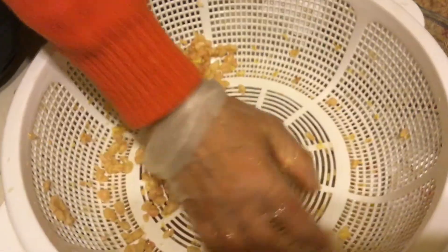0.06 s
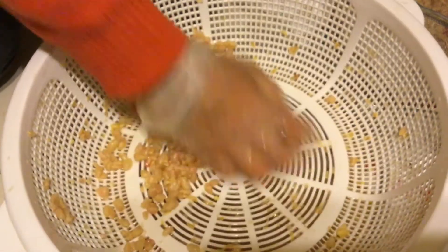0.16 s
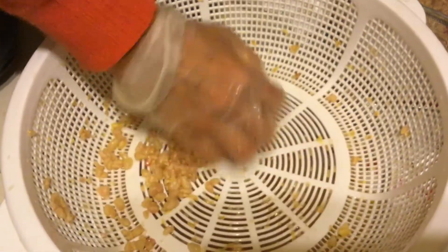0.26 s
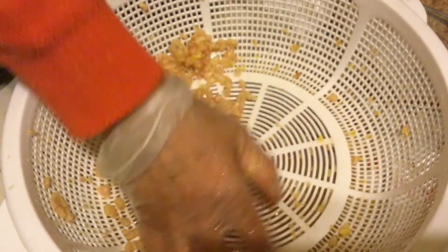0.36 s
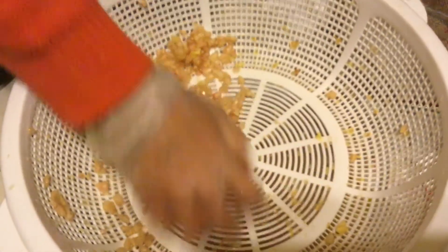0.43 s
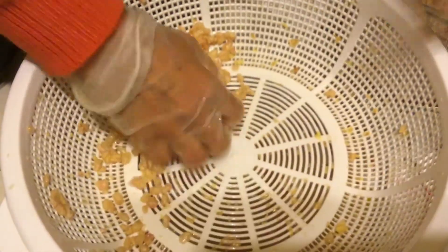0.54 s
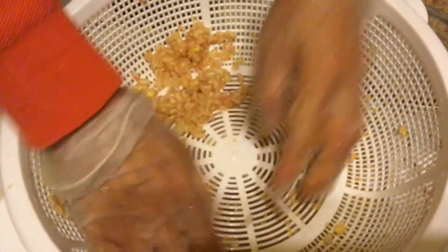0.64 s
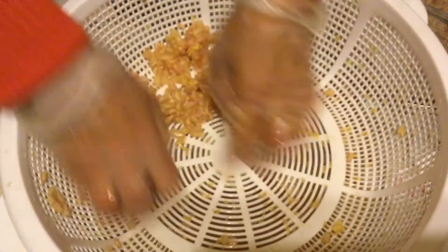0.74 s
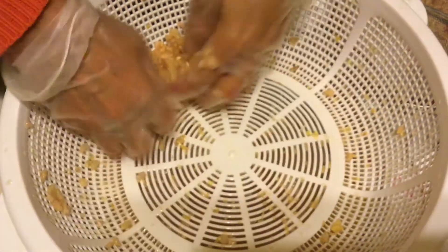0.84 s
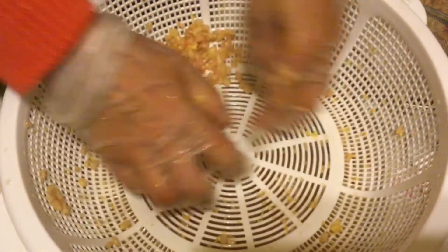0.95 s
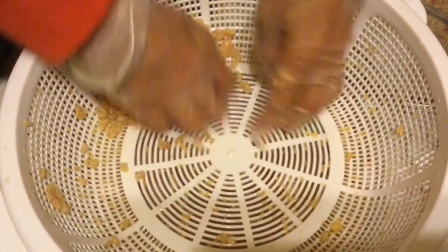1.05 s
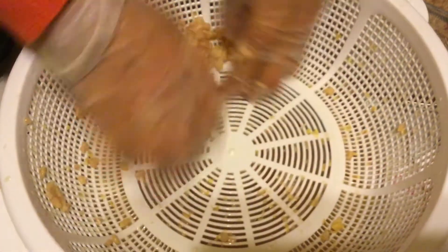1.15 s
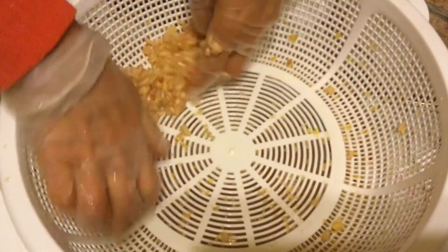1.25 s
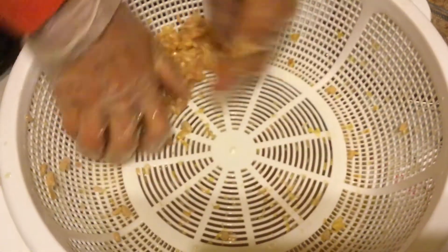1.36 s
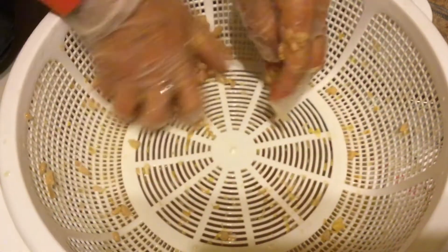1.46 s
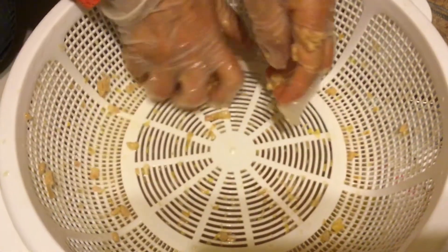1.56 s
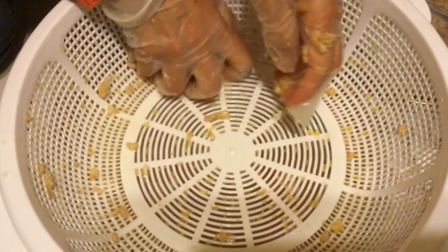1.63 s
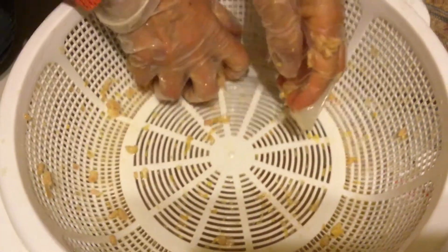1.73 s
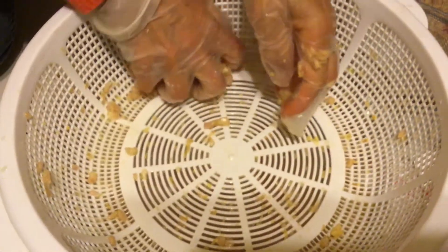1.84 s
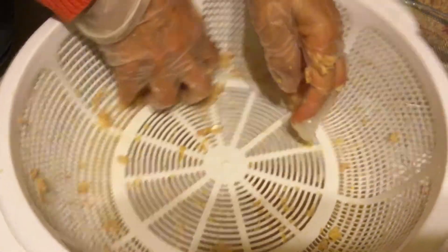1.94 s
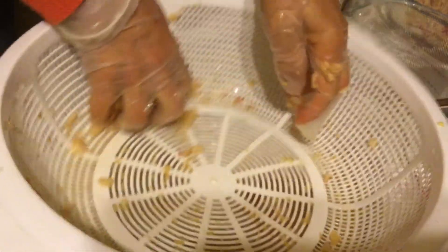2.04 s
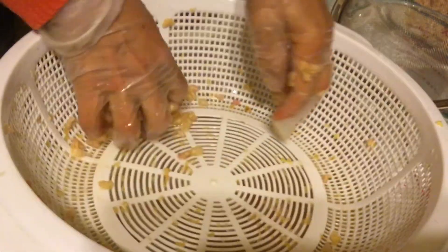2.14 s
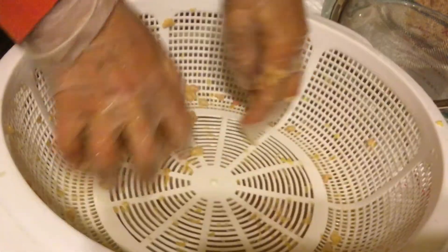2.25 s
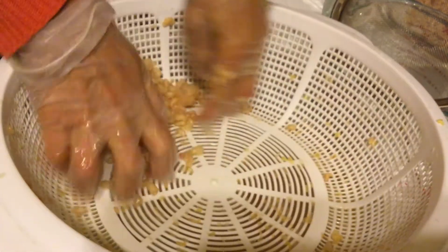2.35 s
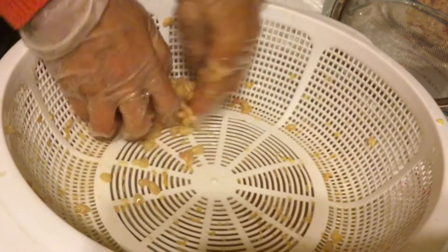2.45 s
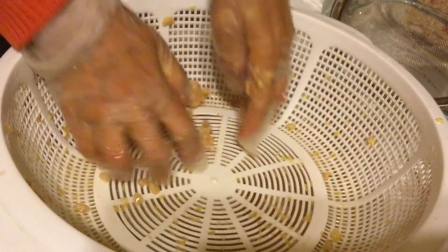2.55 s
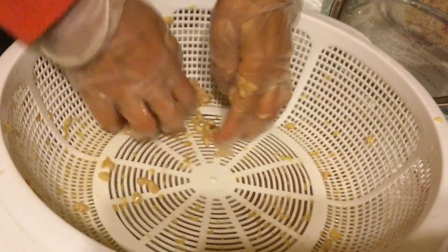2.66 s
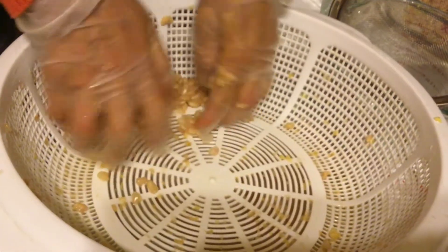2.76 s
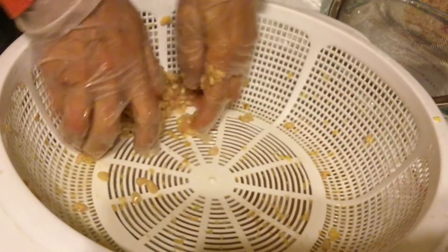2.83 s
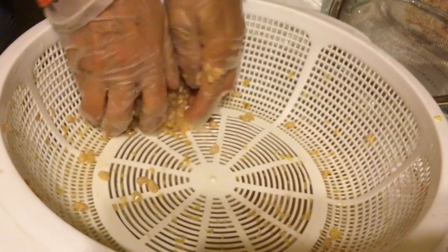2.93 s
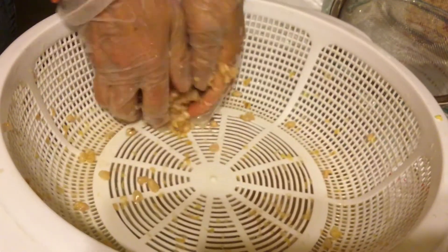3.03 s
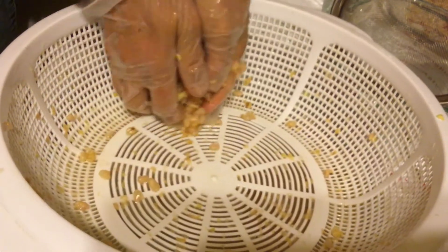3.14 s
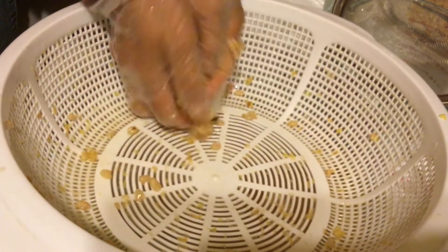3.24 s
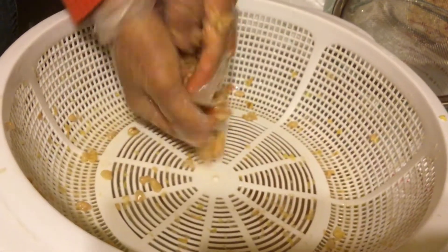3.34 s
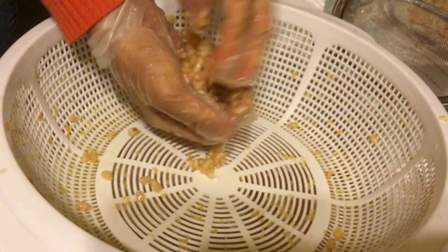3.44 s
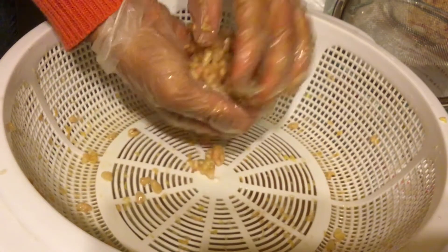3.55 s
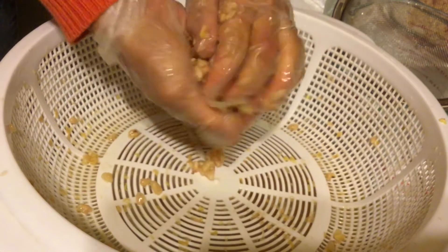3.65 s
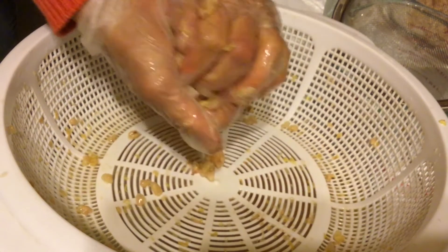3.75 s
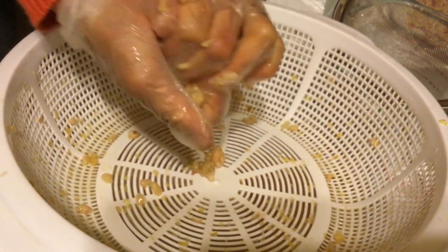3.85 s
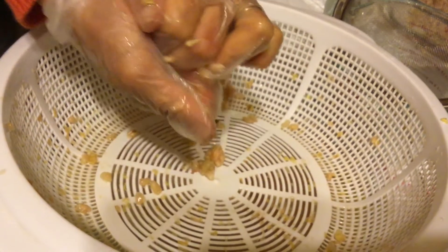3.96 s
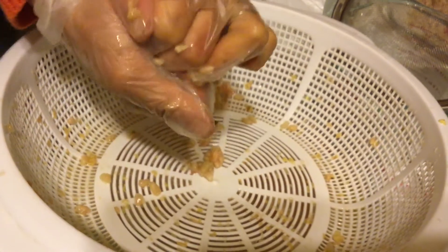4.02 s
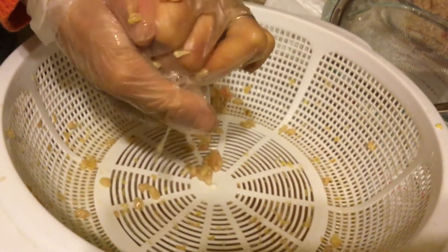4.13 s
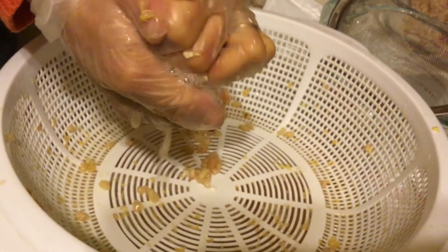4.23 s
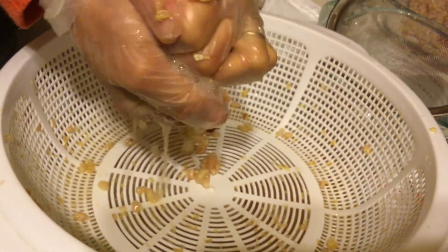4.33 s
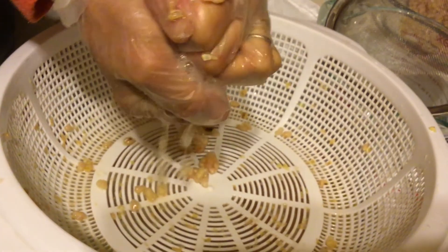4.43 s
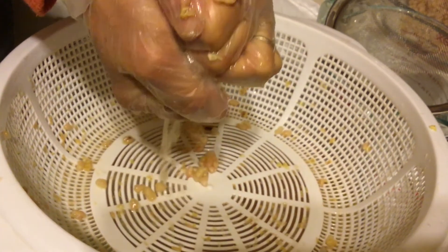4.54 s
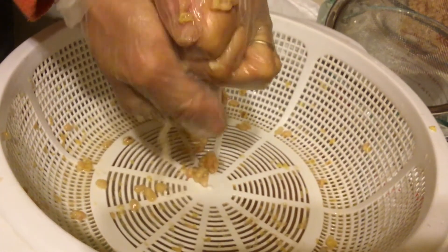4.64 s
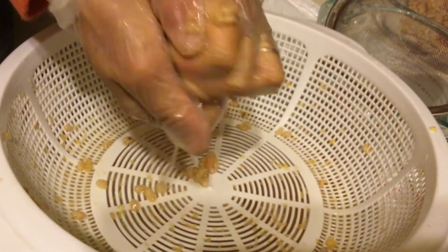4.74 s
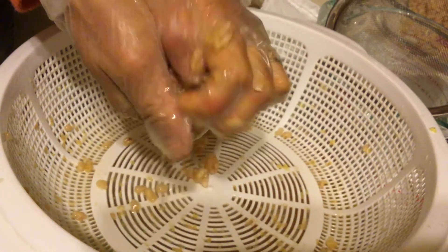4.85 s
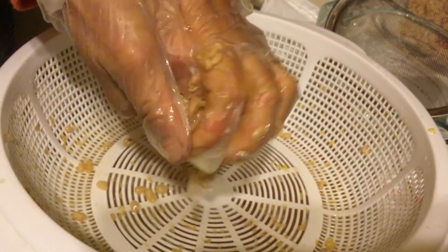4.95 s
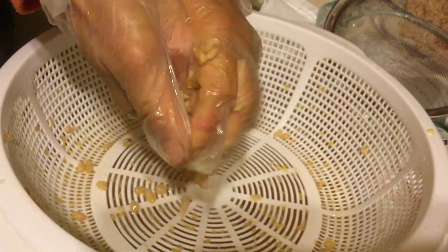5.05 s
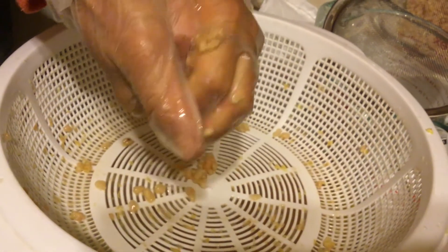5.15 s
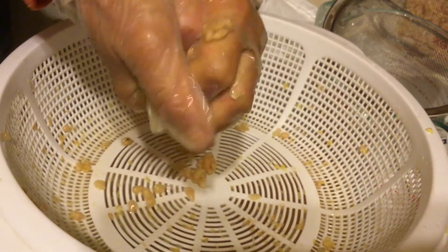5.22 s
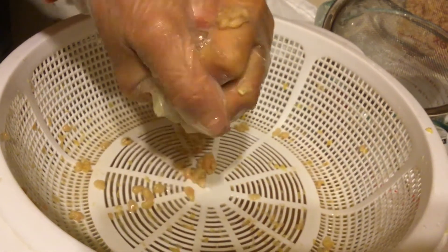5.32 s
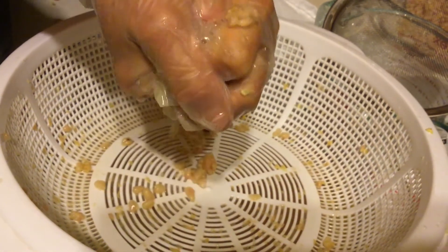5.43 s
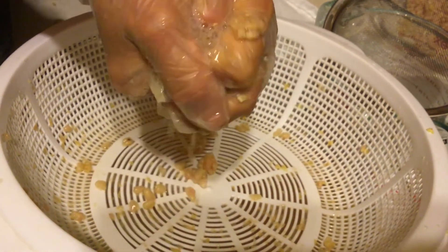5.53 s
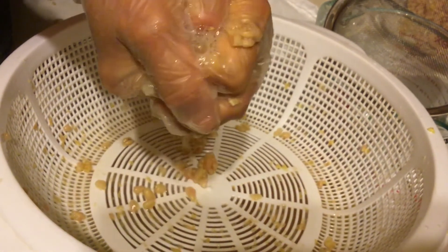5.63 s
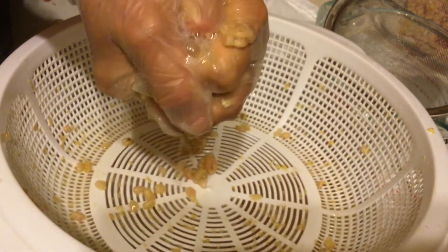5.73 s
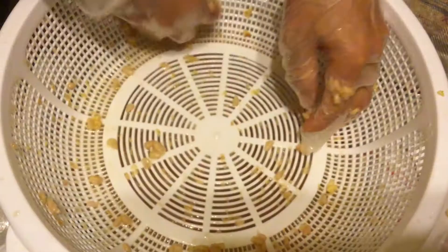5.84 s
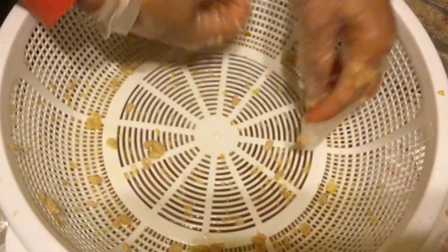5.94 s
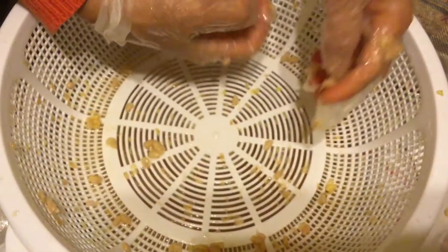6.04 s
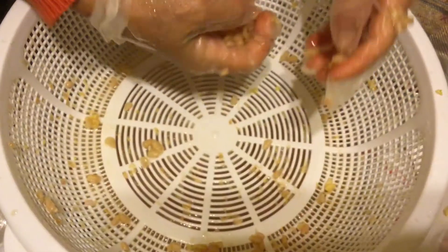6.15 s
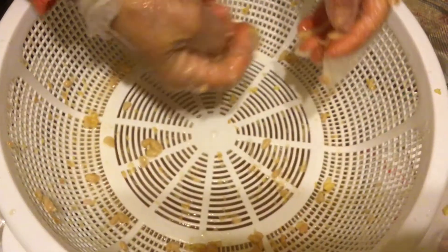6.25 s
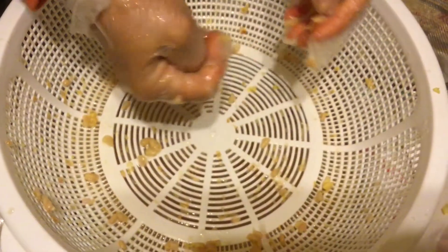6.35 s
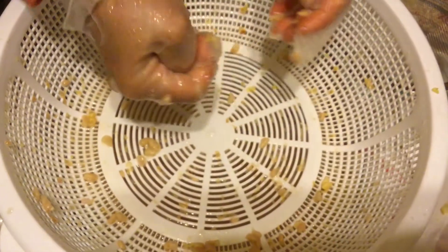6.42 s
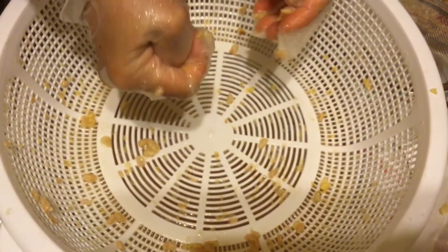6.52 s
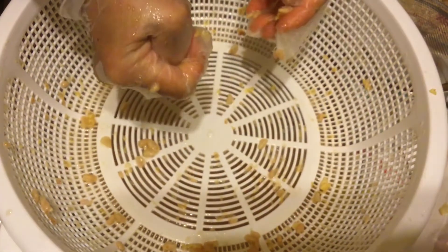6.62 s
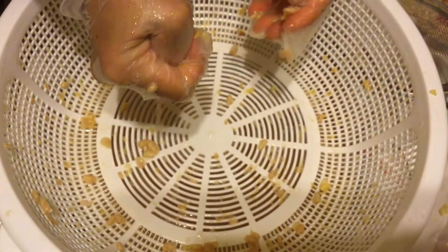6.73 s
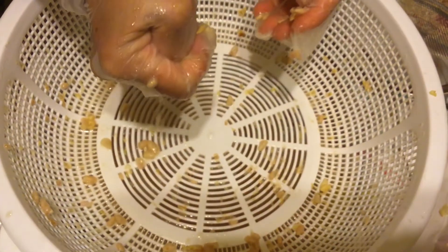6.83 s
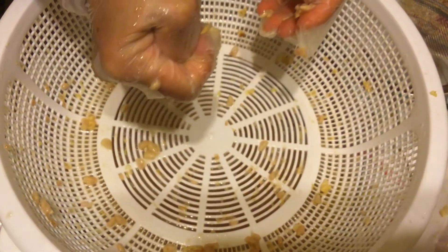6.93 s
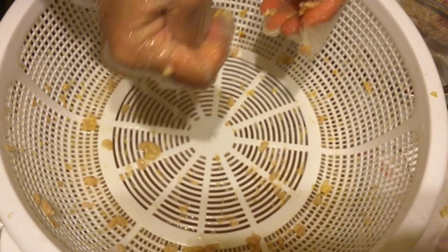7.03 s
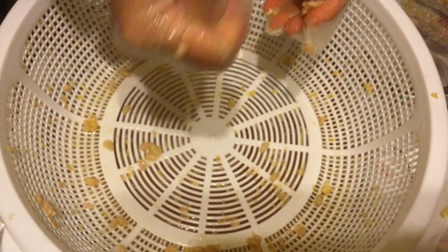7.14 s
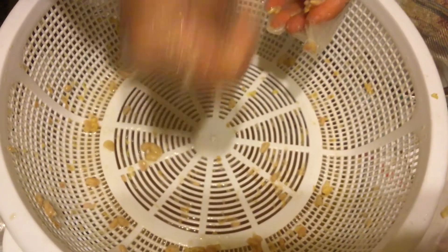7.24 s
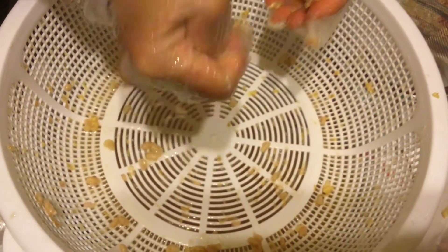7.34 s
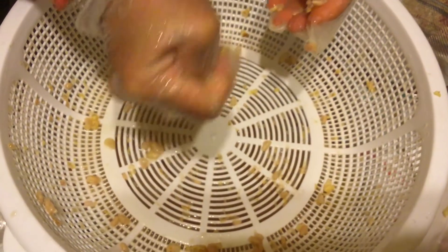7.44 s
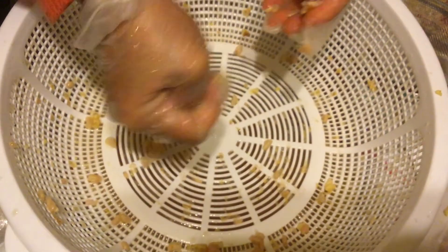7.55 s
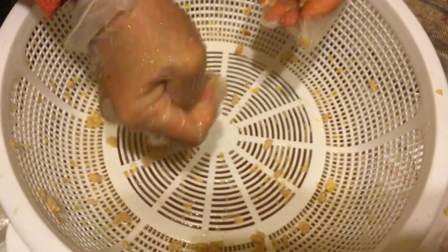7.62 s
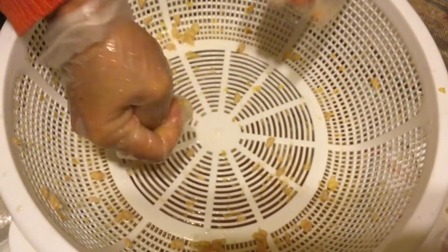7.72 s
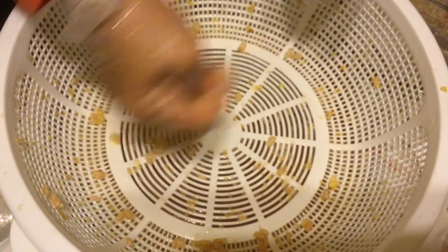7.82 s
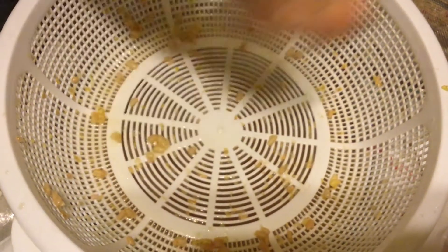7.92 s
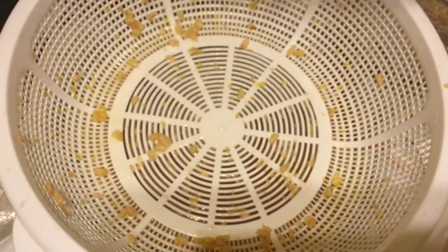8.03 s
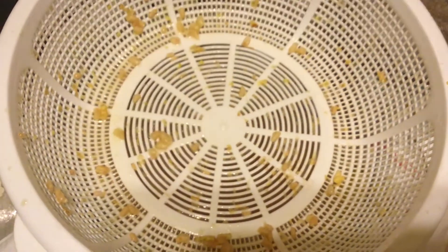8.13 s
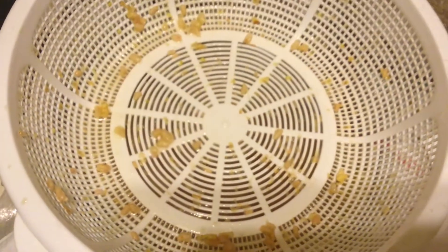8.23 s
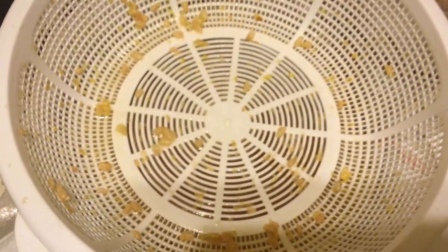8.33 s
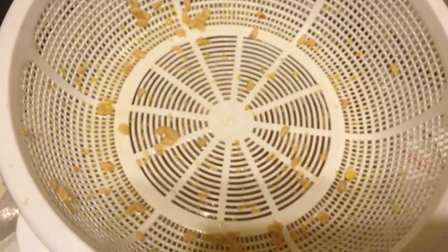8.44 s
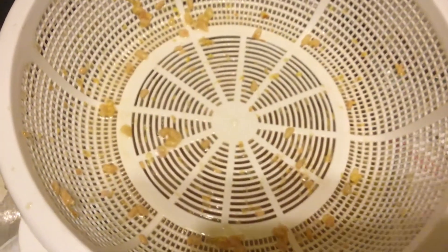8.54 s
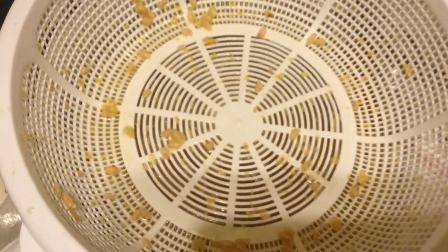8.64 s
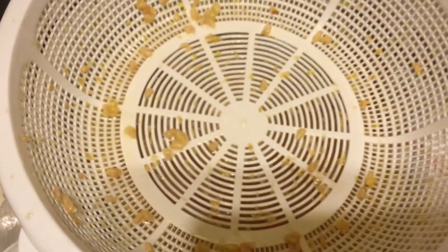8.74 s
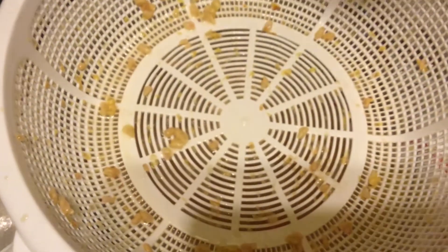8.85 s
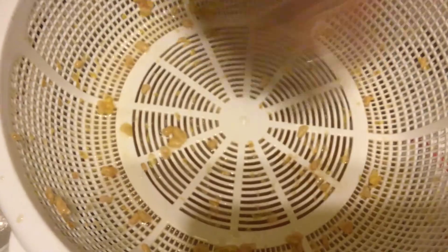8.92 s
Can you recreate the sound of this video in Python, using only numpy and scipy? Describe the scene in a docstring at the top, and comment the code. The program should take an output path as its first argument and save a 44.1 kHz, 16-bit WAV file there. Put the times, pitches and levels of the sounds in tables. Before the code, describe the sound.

Gloved hands scrape and knock wet seeds around a slotted plastic colander, then squeeze them with squishy crunches and crinkles over low rumble.

```python
"""Gloved hands sweep wet seeds across a slotted plastic colander, gather them and squeeze them out.
Knocks and scrapes ring the modes of its shell; wet seeds crunch as short rings and cracks over a rustle.
Gloves slide as fluttering hiss with ticks, creases snap, juice bubbles whistle and wet film squeaks.
A few dull thuds with falling pitch come through the counter; a low wavering noise rumbles in the kitchen."""
import sys
import numpy as np
from scipy import signal
from scipy.fft import rfft, irfft, next_fast_len
from scipy.io import wavfile

SR = 44100
rng = np.random.default_rng(int(sys.argv[2]) if len(sys.argv) > 2 else 0)


def generate_wav(signal):
    """Clip the signal to [-1, 1] and save it as 16-bit WAV at the path in sys.argv[1]."""
    frames = np.transpose(np.atleast_2d(signal))
    scaled = np.clip(frames, -1, 1) * 32767
    pcm = np.round(scaled).astype(np.int16)
    wavfile.write(sys.argv[1], SR, pcm)


N = 396018


def from_db(db):
    """Amplitude gain of a level in dB."""
    return 10 ** (np.asarray(db) / 20)


def rms_one(x):
    """Scale a signal to rms 1."""
    return x / np.sqrt(np.mean(x ** 2) + 1e-20)


def in_time(rows):
    """Turn a table of curve points into its columns, one value a sample."""
    s, *columns = np.transpose(rows)
    return [np.interp(np.arange(N) / SR, s, column) for column in columns]


def drift(rate_hz):
    """Slow random wander of spread 1: smoothed noise, computed at every 20th sample."""
    r = np.exp(-40 * np.pi * rate_hz / SR)
    noise = rng.standard_normal(N // 20 + 2002)
    slow = signal.lfilter([1], [1, -2 * r, r * r], noise)[2000:]   # skip the filter's start
    return np.interp(np.arange(N) / 20, np.arange(len(slow)), rms_one(slow))


def filter_sos(x, order, hz, kind):
    """Butterworth filter."""
    return signal.sosfilt(signal.butter(order, hz, kind, fs=SR, output="sos"), x)


def colour(x, spectrum):
    """Filter a signal by gains drawn over log frequency, then scale it to rms 1."""
    size = next_fast_len(N)
    hz = np.maximum(np.fft.rfftfreq(size, 1 / SR), 1)
    points = np.array(spectrum)
    gain = from_db(np.interp(np.log(hz), np.log(points[:, 0]), points[:, 1]))
    return rms_one(irfft(rfft(x, size) * gain, size)[:N])


def ring(clicks, hz, t60):
    """A resonator: a unit click sets a dying sine of height 1 ringing."""
    r = from_db(-60 / (t60 * SR))
    w = 2 * np.pi * hz / SR
    return signal.lfilter([0, np.sin(w)], [1, -2 * r * np.cos(w), r * r], clicks + 1e-18)


def grains(per_s, spread_db, clump_db):
    """Random clicks of unequal size that come in clumps; the denser, the smaller each."""
    heights = from_db(spread_db * np.minimum(rng.exponential(1, N), 4))
    sizes = heights * rng.choice([-1, 1], N)
    chance = per_s * from_db(clump_db * drift(30)) / SR
    return rms_one(sizes * (rng.random(N) < chance) / np.sqrt(per_s))


def pops(clicks, low_hz, high_hz, cycles):
    """Clicks dealt at random to 24 short rings spread in pitch; each dies by 60 dB in so many cycles."""
    pitches = np.geomspace(low_hz, high_hz, 24)
    dealt = rng.integers(0, 24, N)
    rings = (ring(clicks * (dealt == k), hz, cycles / hz) * np.sqrt(hz) for k, hz in enumerate(pitches))
    return rms_one(sum(rings))


def movement():
    """Control levels of scrape, crunch and slide: every stroke swells and fades over the fidgeting."""
    # Sweeps, scoops and squeezes. Each row: start in seconds, length in seconds, place of the peak
    # as a share of the length, then peak control levels in dB of shell scrape, wet crunch, glove slide.
    strokes = [(0.074, 0.16, 0.48, -16, -20, -24.5), (0.413, 0.14, 0.19, -21, -23, -28),
               (0.649, 0.015, 0.36, -18.5, -19.5, -31), (0.696, 0.16, 0.74, -14, -15.5, -25.5),
               (0.899, 0.075, 0.93, -25, -44.5, -48), (1.032, 0.059, 0.21, -11.5, -20, -28),
               (1.093, 0.13, 0.43, -24, -53, -28.5), (1.215, 0.065, 0.67, -19, -24, -35),
               (1.272, 0.1, 0.34, -14.5, -12.5, -31), (1.373, 0.046, 0.82, -13.5, -17, -27),
               (1.421, 0.17, 0.11, -16.5, -14, -29), (1.555, 0.15, 0.2, -24, -25, -35.5),
               (1.697, 0.5, 0.094, -37, -30.5, -37), (1.827, 0.14, 0.73, -31, -26.5, -43),
               (1.958, 0.1, 0.46, -57, -35.5, -35.5), (2.067, 0.14, 0.2, -31.5, -29.5, -53),
               (2.243, 0.079, 0.81, -22.5, -51, -54), (2.313, 0.1, 0.49, -35, -41, -30.5),
               (2.361, 0.1, 0.35, -9.5, -15, -25), (2.531, 0.17, 0.55, -21, -25.5, -31),
               (2.735, 0.13, 0.56, -18.5, -21, -27.5), (2.836, 0.095, 0.35, -15, -17, -27),
               (2.91, 0.13, 0.6, -21, -19.5, -25), (3.002, 0.16, 0.42, -34, -23, -29.5),
               (3.152, 0.25, 0.35, -50, -48, -29), (3.575, 0.17, 0.9, -63, -40, -31.5),
               (3.703, 0.35, 0.44, -59, -32, -35), (3.93, 0.35, 0.36, -41, -31.5, -66),
               (4.103, 0.22, 0.58, -60, -34.5, -37), (4.372, 0.16, 0.44, -36, -38, -39.5),
               (4.517, 0.08, 0.91, -56.5, -48, -48), (4.679, 0.14, 0.59, -32.5, -24.5, -26),
               (4.735, 0.2, 0.73, -62, -33.5, -26.5), (5.03, 0.049, 0.7, -30, -41, -32.5),
               (5.102, 0.11, 0.13, -27.5, -23.5, -31), (5.156, 0.22, 0.4, -40, -24, -44),
               (5.408, .2, 0.94, -38.5, -32, -43), (5.642, 0.074, 0.26, -36.5, -41, -59),
               (5.786, 0.11, 0.37, -38.5, -30, -30.5), (5.968, 0.13, 0.38, -38.5, -63, -53),
               (6.207, 0.29, 0.33, -41, -40.5, -39), (6.439, 0.18, 0.31, -54, -39, -42),
               (7.333, 0.26, 1, -61, -47, -49.5), (8.097, 0.3, 0.8, -48, -49, -46),
               (8.852, 0.11, 0.28, -62, -40, -40.5)]
    # Small restless movement under the strokes. Each row: time in seconds, then control levels in dB
    # of scrape, crunch and slide.
    fidget = [(0.0, -49, -51, -51), (1.0, -37.5, -49.5, -47.5), (2.0, -48.5, -42, -41.5),
              (3.4, -43.5, -41.5, -48.5), (4.5, -49.5, -38, -45.5), (5.7, -47.5, -44, -48),
              (6.6, -48, -46.5, -46.5), (6.95, -44.5, -50.5, -55), (7.6, -47.5, -52, -49.5),
              (8.6, -48.5, -50, -53.5), (8.98, -48.5, -47, -54)]
    edge_db = 17   # a stroke starts and ends this far below its peak
    arch = np.array([[1.4], [1.53], [3.23]])   # swell of scrape, crunch, slide: 1 pointed, 3 flat-topped
    t = np.arange(N) / SR
    power = from_db(in_time(fidget)) ** 2
    for start, length, share, *peak_db in strokes:
        near = slice(max(round((start - length) * SR), 0), round((start + 2 * length) * SR))
        late = (t[near] - start) / length - share
        away = np.where(late < 0, -late / share, late / (1 - share))   # 0 at the peak, 1 at either end
        power[:, near] += from_db(np.array(peak_db)[:, None] - edge_db * away ** arch) ** 2
    return 10 * np.log10(power)


def colander(scrape_db):
    """Knocks and the scrape over the slots drive one set of shell modes; each knock has its own mix of them."""
    # Fingers and seeds striking the shell. Each row: start in seconds, relative peak level in dB,
    # relative share of the kilohertz modes in dB, relative share of the treble modes in dB.
    knocks = [(0.266, -4, -19, -8), (0.315, -17, -3, -26), (0.402, -3.5, -14, -10), (0.472, 8, -10, -20),
              (0.625, -25.5, 10, -12), (0.655, -6, -28, -16), (0.9, -22, 10, -21), (0.939, -2, -6, -29),
              (1.032, 0, -0.5, -29), (1.139, -10, -28, -23), (1.24, -4, -17, -9), (1.294, -23, 9, -10),
              (1.329, 3, -10, -1), (1.364, -3, -14, -3), (1.384, -9, -1, -12), (1.405, 4.5, -5, -4.5),
              (1.435, -13.5, 8, -12), (1.452, -13, 9.5, 5), (1.485, -10, -10, -15), (1.519, -3, -5, -22),
              (1.591, -17, 14, -13), (1.862, -10, -10, -16), (1.897, -11, -7.5, -2), (2.077, -35, 6, 14),
              (2.197, -13.5, -21, -18), (2.24, 5, -12.5, -23), (2.279, -1, -8, -29), (2.291, -1, -22, -22),
              (2.315, 4, -34, -33), (2.368, 9.5, -31, -27), (2.547, -17, -3, -1), (2.593, -17, 9, 2),
              (2.802, 4, -29, -12.5), (2.85, -8, -20, -6), (2.868, 15.5, -20, -29), (3.371, -3.5, -39, -22),
              (3.39, -11, -30, -23), (3.467, -15, -11, -15), (3.509, -11.5, -21, -24), (3.604, -27, 5, -6),
              (3.687, -8, -25, -23), (4.405, -6.5, 0.5, -22), (5.046, -16, -29, -29), (5.059, -7, -25, -30),
              (5.105, -2.5, -12, -35), (5.118, -9, -24, -30), (5.205, -12, -19, -17),
              (5.672, -13, -10, -24), (5.765, -18, -16, -14), (6.021, -28.5, 8.5, 10),
              (6.046, -20, -6, -15), (6.077, -9, -24, -24), (6.093, -17.5, -4.5, -22),
              (6.134, -8.5, -15, -17), (6.207, -18, -11, -24), (6.47, -17, -4, -13), (7.412, -20.5, -5, -8),
              (7.458, -9.5, -5.5, -8.5), (8.96, -35, 13, -3)]
    # Modes of the shell. Each row: pitch in Hz, relative level in dB, base decay by 60 dB in seconds
    # (the scrape rings for .8 of it; struck treble modes use muted_t60_s instead).
    shell_modes = [(628, 1, 0.045), (688, -3, 0.026), (770, -5.5, 0.012), (900, 2, 0.0079),
                   (1003, 4, 0.018), (1005, -2.5, 0.029), (1060, 6.5, 0.0031), (1500, -12, 0.034),
                   (1830, -6.5, 0.011), (2600, -14, 0.0022)]
    low_below_hz, treble_from_hz = 850, 1350   # the kilohertz modes lie between
    muted_t60_s = .008   # the finger stays and mutes the struck treble
    detune = .025        # spread of the shell's pitch from knock to knock, as the hand loads it
    bend_s = .0004       # wander in time that shifts the scraped pitch by some percent

    s, peak_db, middle_db, treble_db = np.transpose(knocks)
    at = np.round(s * SR).astype(int)
    chance = rng.normal(0, 1, (len(at), len(shell_modes)))
    tune = 1 + detune * rng.normal(0, 1, len(at))

    slips = grains(per_s=300 * from_db(0.54 * (scrape_db + 43.5)), spread_db=2.5, clump_db=5.0)
    # a light touch rubs smoothly, a firm one slips
    slips = slips + from_db(-.4 * (scrape_db + 44)) * rng.standard_normal(N)
    slips = slips / np.sqrt(1 + from_db(-.8 * (scrape_db + 44)))
    uneven_db = np.clip(.35 * (scrape_db + 52), 1, 5.5)   # small under a light touch

    struck, scraped = np.zeros(N + SR), np.zeros(N)
    t = np.arange(2500) / SR
    for k, (hz, level_db, t60) in enumerate(shell_modes):
        low = hz < low_below_hz
        treble = hz >= treble_from_hz
        if low:
            share_db = 0
        elif treble:
            share_db = treble_db + 19.0
        else:
            share_db = middle_db + 13.5
        luck_db = 2 * chance[:, k]   # no two knocks land on the same spot
        heights = from_db(peak_db - 11.5 + level_db + share_db + luck_db)
        side = 1 if low else (-1) ** k   # upper modes swing out on alternate sides
        swell = 1 - np.exp(-t / (.0012 if low else .0001))   # the low modes take a moment to swell
        fade = from_db(-60 * t / (muted_t60_s if treble else t60)) * swell
        for start, height, shift in zip(at, heights, tune):
            struck[start:start + len(t)] += side * height * fade * np.sin(2 * np.pi * hz * shift * t)
        # the moving hand favours now one mode, now another, and damps the ring
        drive = slips * from_db(uneven_db * drift(25))
        scraped += side * from_db(level_db) * ring(drive, hz, .8 * t60)

    # the pressing hand bends the wall, so its pitch wanders
    scraped = np.interp(np.arange(N) + bend_s * SR * drift(10), np.arange(N), scraped)
    contact = np.hanning(round(.0005 * SR))   # a padded fingertip pushes for a moment
    struck = np.convolve(struck, contact / contact.sum())[:N]
    shell = struck + from_db(scrape_db - 1.5) * rms_one(scraped)
    # a slotted wall radiates little below its first mode
    shell = filter_sos(shell, 3, 470, "high")
    # the whole colander shakes on the counter under each stroke
    shake = filter_sos(slips, 2, [200, 450], "band")
    return shell + from_db(scrape_db - 9.5) * rms_one(shake)


def crunch(crunch_db):
    """Wet seeds and skins: short rings and sharp cracks over a rustle; harder pressure packs them closer."""
    # Tone of the wet crunch. Each row: frequency in Hz, relative filter gain in dB.
    crunch_tone = [(300, 0), (700, -8.5), (1500, 3.5), (2500, 4), (4500, 2.5), (7000, -6.5), (12000, -18),
                   (16000, -28)]
    per_s = 900 * from_db(0.33 * (crunch_db + 44.0))
    bursts = pops(grains(per_s, spread_db=9, clump_db=7.0), 1174, 7100, cycles=13.0)
    t = np.arange(200) / SR
    crack = rng.standard_normal(len(t)) * np.exp(-t / .0007)
    cracks = np.convolve(grains(per_s / 12, spread_db=4, clump_db=3), crack)[:N]
    cracks = from_db(0.56 * (crunch_db + 8)) * rms_one(cracks)   # stronger under pressure
    rustle = rng.standard_normal(N) * from_db(4 * drift(60) - 3)
    return from_db(crunch_db - 5.0) * colour(from_db(-6.0) * bursts + cracks + rustle, crunch_tone)


def glove_slide(slide_db):
    """Thin film rubbing on film: a bright fluttering hiss with fine ticks that merge when it slides fast."""
    # Tone of the sliding film. Each row: frequency in Hz, relative filter gain in dB.
    slide_tone = [(1500, -10), (4000, -3.5), (6500, -3), (7600, -7.5), (8800, 0), (11000, -2.5),
                  (14500, -1), (16000, 1)]
    hiss = rng.standard_normal(N) * from_db(2.1 * drift(68))
    per_s = 150 * from_db(1.2 * (slide_db + 50.0))
    ticks = pops(grains(per_s, spread_db=3.0, clump_db=8.0), 2690, 13000, cycles=15.0)
    return from_db(slide_db + 2.0) * colour(hiss + from_db(-4.5) * ticks, slide_tone)


def creases(slide_db):
    """Lone dry ticks of the glove film folding: tiny noise bursts, louder when it slides."""
    clicks = grains(per_s=55, spread_db=5.0, clump_db=4.0)
    t = np.arange(130) / SR
    ticks = np.convolve(clicks, rng.standard_normal(len(t)) * np.exp(-t / 0.0009))[:N]
    ticks = filter_sos(ticks, 2, 3000, "high")
    return from_db(-51.5 + 0.6 * (slide_db + 49)) * rms_one(ticks)


def snaps():
    """Each snap: a short ring at its pitch inside a puff of noise; the film gives way in a few quick steps."""
    # Glove creases and seed skins snapping. Each row: start in seconds, relative peak level in dB,
    # pitch in Hz.
    snap_rows = [(0.079, -13, 2510), (0.1342, -8.5, 3980), (0.1641, -20, 3500), (0.1878, -14, 1970),
                 (0.401, -4, 3880), (0.428, -12, 3200), (0.652, -15.5, 3200), (0.735, -6, 3170),
                 (0.7595, -5, 3930), (1.029, -16, 2100), (1.22, -18, 3240), (1.2383, -5.5, 3570),
                 (1.292, -11, 1760), (1.3617, -7.5, 3540), (1.3958, -7.5, 1550), (1.437, -10, 2500),
                 (1.462, -11, 4970), (1.487, -8.5, 4330), (1.494, -11, 4530), (1.517, -18, 5500),
                 (1.591, -9.5, 1860), (2.0794, -4.5, 4650), (2.0799, -8, 1624), (2.239, -32, 1510),
                 (2.413, -2, 3930), (2.629, -12, 2340), (2.881, -12, 3550), (2.903, -17, 1780),
                 (3.252, -13, 3850), (3.432, -23.5, 2000), (3.447, -14.5, 3900), (3.4922, -21.5, 2200),
                 (4.142, -14.5, 3460), (4.314, -19, 5600), (4.352, -13, 8100), (4.404, -18, 1960),
                 (4.523, -17.5, 4600), (4.556, -20.5, 3180), (4.564, -17, 6000), (4.578, -19, 9000),
                 (4.593, -19, 4500), (4.6221, -10.5, 8700), (4.6445, -14, 8600), (4.658, -17, 4960),
                 (4.6806, -17, 2960), (4.699, -9, 12400), (4.739, -8, 5540), (5.015, -14.5, 3670),
                 (5.116, -15, 3830), (5.158, -11, 5050), (5.1798, -8, 3940), (5.263, -15.5, 2620),
                 (5.443, -22.5, 4020), (5.5837, -20, 1990), (5.6716, -16, 1930), (5.7656, -17, 11800),
                 (6.3207, -12.5, 12900), (6.431, -17, 8900), (6.4793, -15.5, 5660), (6.673, -26, 4800),
                 (6.719, -21, 8950), (6.751, -25, 12100), (6.808, -31.5, 5000), (6.904, -21, 5130),
                 (6.91, -24, 2680), (7.002, -31, 5000), (7.046, -24, 11400), (7.115, -26, 6000),
                 (7.155, -23, 4770), (7.1784, -23.5, 9200), (7.197, -30, 2490), (7.2827, -25, 5960),
                 (7.5536, -21.5, 8300), (7.696, -25.5, 8500), (7.864, -22, 8800), (7.919, -22, 9700),
                 (8.19, -26, 2460), (8.258, -16, 1600), (8.336, -25, 8730), (8.4054, -25.5, 1930),
                 (8.4296, -23, 3350), (8.6508, -22.5, 11200), (8.666, -27, 4020), (8.872, -27.5, 1990),
                 (8.724, -16, 2350), (8.973, -25, 1500)]
    out = np.zeros(N + 2048)
    t = np.arange(900) / SR
    noise = signal.lfilter([1, -1], [1, -.7], rng.standard_normal((len(snap_rows), len(t))), axis=1)
    steps = rng.random((len(snap_rows), 3))
    # a sharp crack and a softer, longer breath
    puff_shape = (1 - np.exp(-t / 0.0019)) * (0.34 * np.exp(-t / 0.00035) + 0.11 * np.exp(-t / 0.0028))
    for (s, peak_db, hz), puff, step in zip(snap_rows, noise, steps):
        tone = np.sin(2 * np.pi * hz * t) * t * hz * np.exp(-t * hz / 0.41)
        burst = 2.78 * tone + puff * puff_shape
        at = round(s * SR)
        out[at:at + len(t)] += from_db(peak_db + 11.5) * burst
        for late in step:   # within 2 ms; later steps are weaker
            after = at + round(.002 * late * SR)
            sign = np.sign(late % .1 - .05)   # either way by chance
            out[after:after + len(t)] += from_db(peak_db + 6 - 8 * late) * burst * sign
    return out[:N]


def bubbles():
    """A bubble rings at its pitch, rising a little as it opens."""
    # Juice bubbles that whistle as they burst. Each row: start in seconds, peak level in dB,
    # starting pitch in Hz, decay by 60 dB in seconds.
    bubble_rows = [(3.251, -15, 4030, 0.012), (4.233, -21.5, 2900, 0.045), (5.017, -20, 3150, 0.032),
                   (7.284, -32.5, 5750, 0.093), (7.402, -33, 4240, 0.037)]
    out = np.zeros(N)
    t = np.arange(3000) / SR
    for s, peak_db, hz, t60 in bubble_rows:
        at = round(s * SR)
        whistle = np.sin(2 * np.pi * hz * (t + 0.95 * t ** 2))
        out[at:at + len(t)] += from_db(peak_db - 60 * t / t60) * whistle
    return out


def squeaks():
    """Wet film skidding on plastic: a short gliding tone with weak overtones and an unsteady level."""
    # Each row: start in seconds, length in seconds, first pitch in Hz, last pitch in Hz,
    # relative level in dB.
    squeak_rows = [(2.384, 0.03, 578, 670, -7.5), (8.42, .035, 1710, 1420, -43)]
    out = np.zeros(N)
    for start, length, first_hz, last_hz, peak_db in squeak_rows:
        size = round(length * SR)
        turn = 2 * np.pi * np.cumsum(np.linspace(first_hz, last_hz, size)) / SR
        tone = np.sin(turn) + .45 * np.sin(2 * turn) + .25 * np.sin(3 * turn)
        at = round(start * SR)
        out[at:at + size] += from_db(peak_db) * tone * np.hanning(size) ** .5
    return out * from_db(2 * drift(120))


def thuds():
    """A blow travelling through a plate: the treble arrives first, so the pitch drops at once, then sags."""
    # Blows through the counter. Each row: start in seconds, relative level in dB.
    thud_rows = [(2.0801, -16.5), (6.5041, -7.5), (8.259, -6), (8.3097, -15)]
    out = np.zeros(N)
    t = np.arange(2000) / SR
    hz = 120 + 1800 * np.exp(-t / .0004) + 165 * np.exp(-t / .006)
    envelope = (1 - np.exp(-t / .0005)) * np.exp(-(t / .009) ** 3)
    thud = np.sin(2 * np.pi * np.cumsum(hz) / SR) * envelope
    thud += 0.35 * np.sin(2 * np.pi * 680 * t) * np.exp(-t / 0.004)
    for s, peak_db in thud_rows:
        at = round(s * SR)
        dull_noise = signal.lfilter([1], [1, -.93], rng.standard_normal(len(t)))
        rattle = rms_one(dull_noise) * np.exp(-t / .005)
        out[at:at + len(t)] += from_db(peak_db) * (thud + .15 * rattle)
    return out


def rumble():
    """Low noise heaped near 80 Hz; the heap wavers, its upper skirt is steady."""
    # Tone of the rumble. Each row: frequency in Hz, relative level per Hz in dB.
    rumble_tone = [(15, -53), (25, -20.5), (64, -2.5), (85, 1.5), (123, -13.5), (192, -16.5), (340, -22.5),
                   (500, -34), (900, -90)]
    # Slow course of the heap, before its wavering. Each row: time in seconds, level in dB.
    heap_level = [(0.0, -31), (0.5, -50), (0.6, -37), (1.55, -37.5), (1.67, -32.5), (4.2, -37.5),
                  (5.6, -30), (6.0, -35.5), (7.4, -36), (8.98, -34)]
    split_hz, skirt_db = 126, -36   # above this pitch the rumble holds steady
    level_db, = in_time(heap_level)
    noise = colour(rng.standard_normal(N), rumble_tone)
    heap = filter_sos(noise, 4, split_hz, "low")
    skirt = filter_sos(noise, 4, split_hz, "high")
    return from_db(level_db + 2 * drift(3)) * heap + from_db(skirt_db) * skirt


def room(x):
    """Close reflections: a short tail of dying noise is added to the sound."""
    t60_s, tail_db = .08, -15
    t = np.arange(int(.25 * SR)) / SR
    tail = rng.standard_normal(len(t)) * from_db(-60 * t / t60_s) * (t > .002)
    tail = tail / np.sqrt(np.sum(tail ** 2))
    return x + from_db(tail_db) * signal.fftconvolve(x, tail)[:N]


def scene():
    """Hands and colander in the room, with thuds through the counter, over the rumble."""
    scrape_db, crunch_db, slide_db = movement()
    hands = colander(scrape_db) + crunch(crunch_db)
    hands += glove_slide(slide_db) + creases(slide_db) + snaps()
    hands += bubbles() + squeaks()
    return (room(hands) + thuds() + rumble())[None]


def record(dry):
    """The deepest bass is lost, peaks are rounded, the top is cut."""
    cutoff_hz = 15850
    dry = filter_sos(dry, 6, 40, "high")
    rounded = 1.3 * np.tanh(dry / 1.3)
    # the stopband, 70 dB down, starts just above the cutoff
    top_cut = signal.cheby2(16, 70, cutoff_hz * 1.015, fs=SR, output="sos")
    return signal.sosfilt(top_cut, rounded)


dry = scene()
out = record(dry)
generate_wav(out)
```